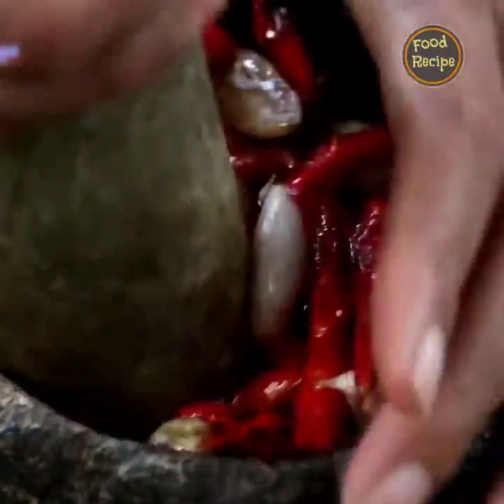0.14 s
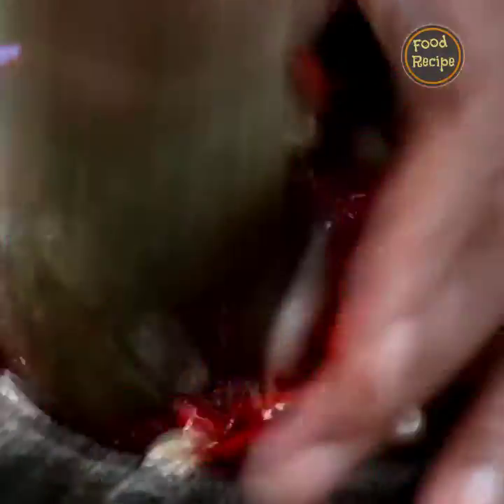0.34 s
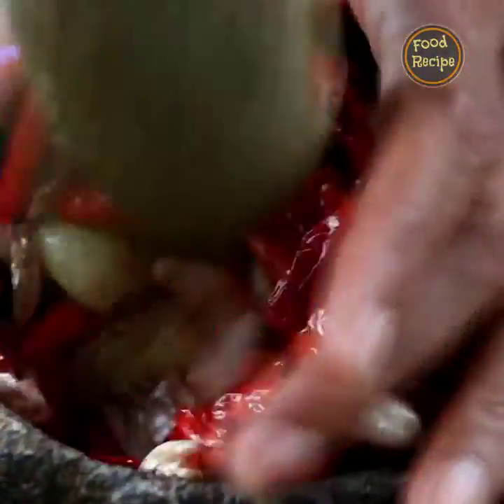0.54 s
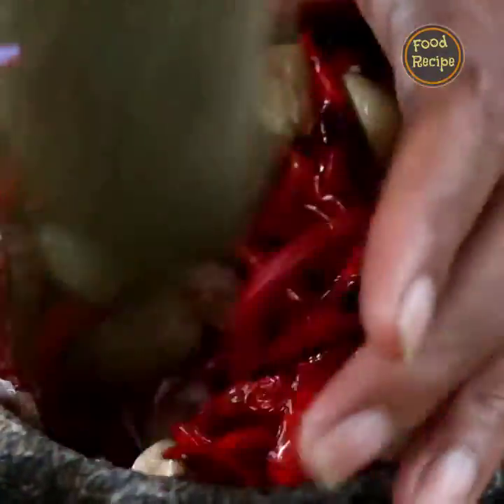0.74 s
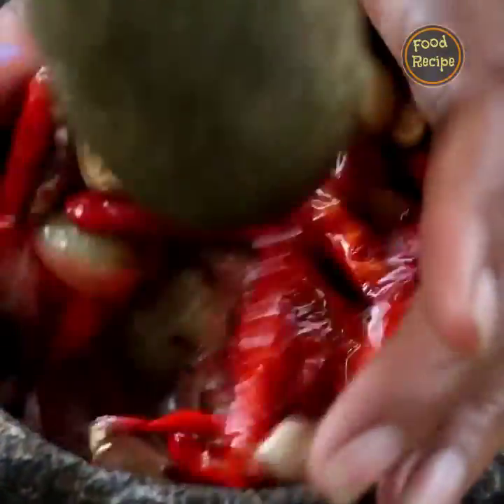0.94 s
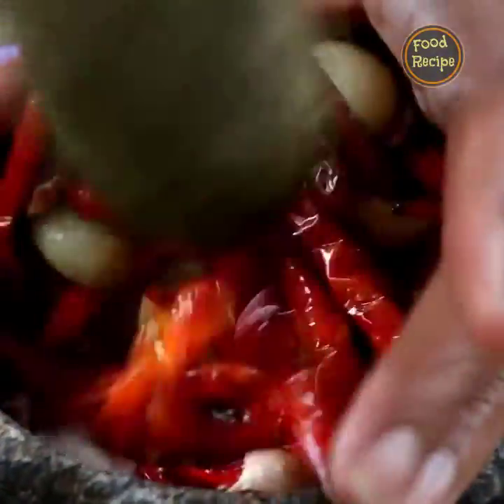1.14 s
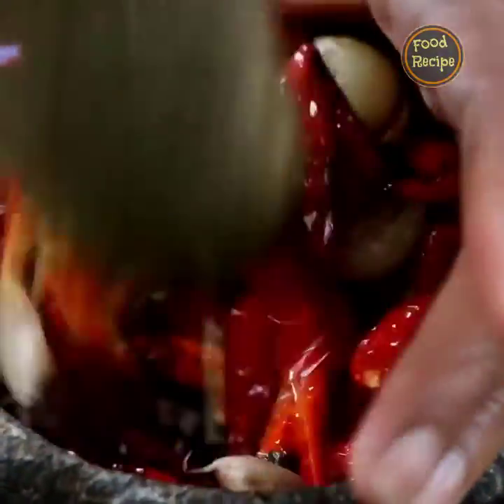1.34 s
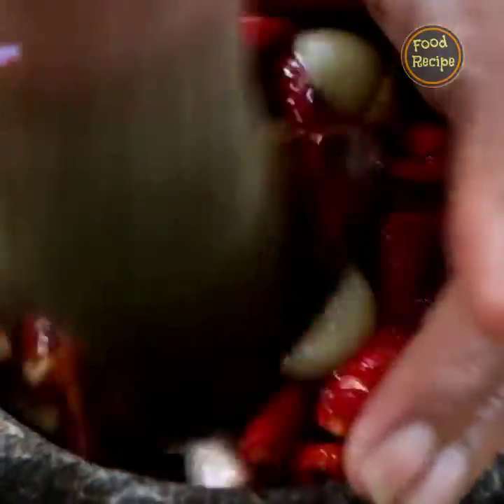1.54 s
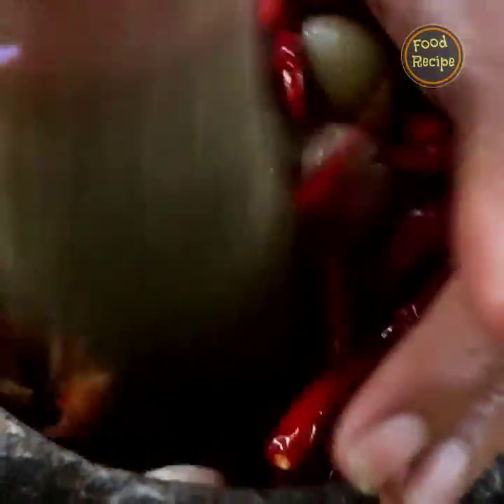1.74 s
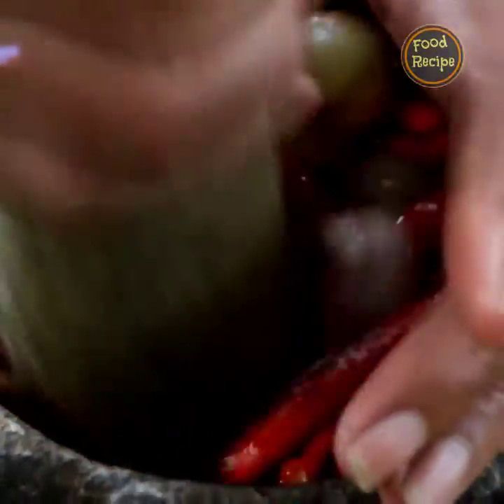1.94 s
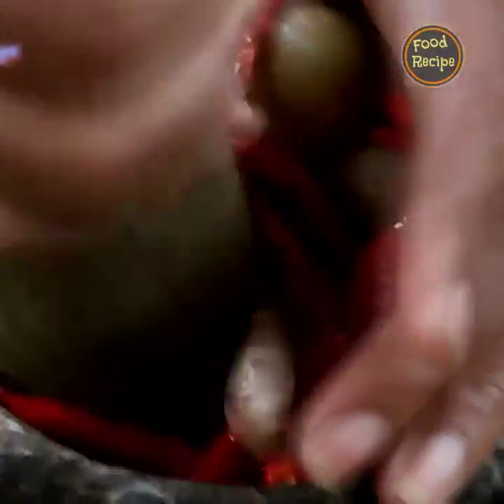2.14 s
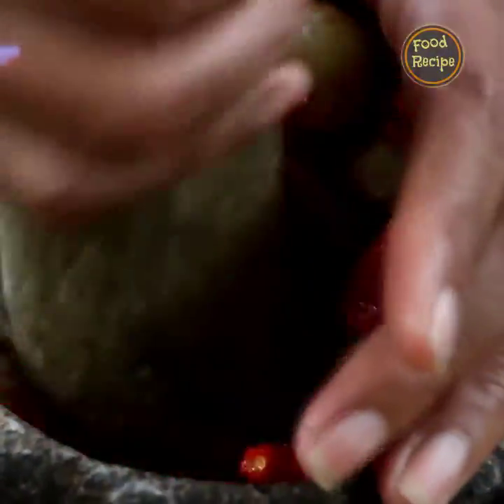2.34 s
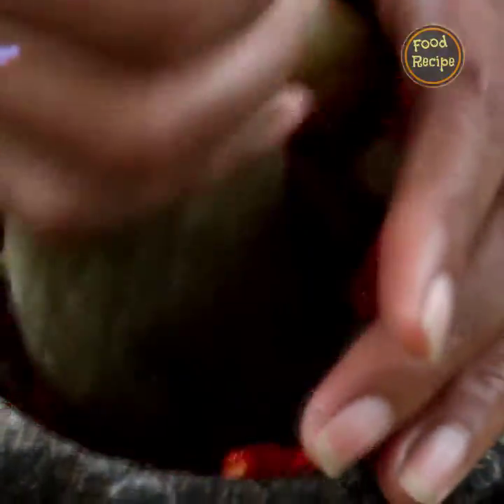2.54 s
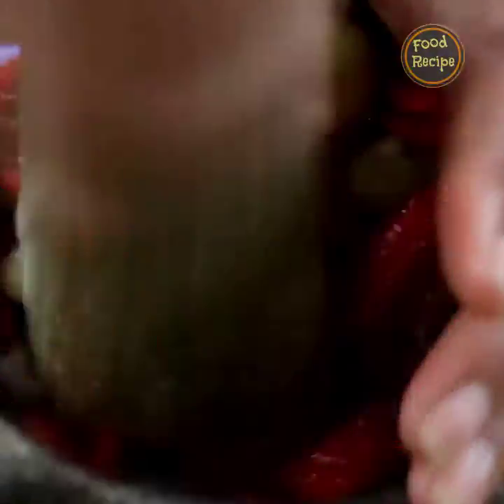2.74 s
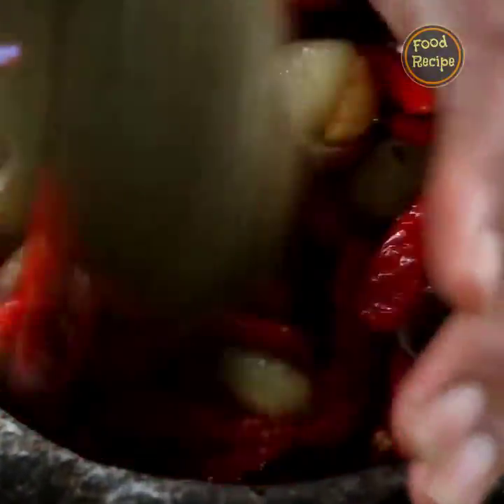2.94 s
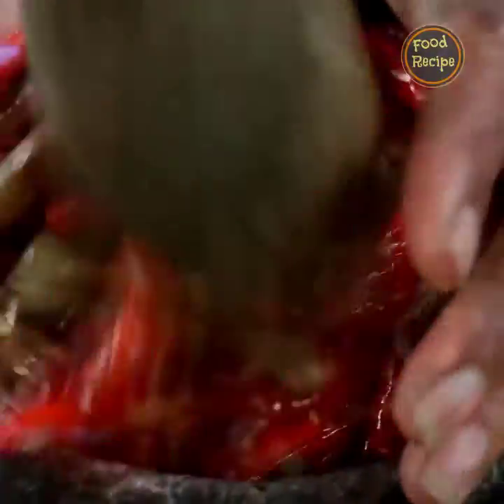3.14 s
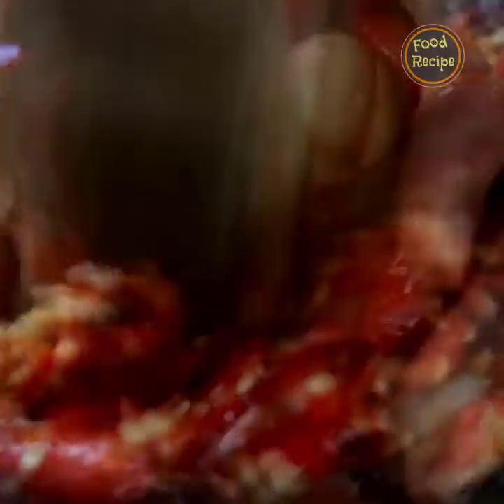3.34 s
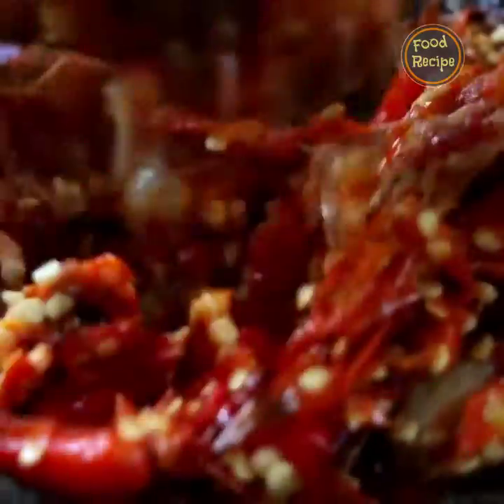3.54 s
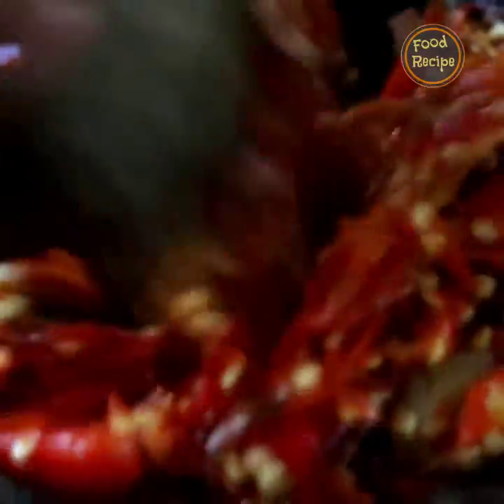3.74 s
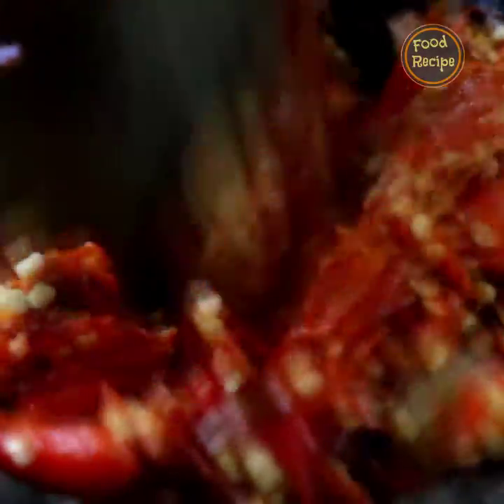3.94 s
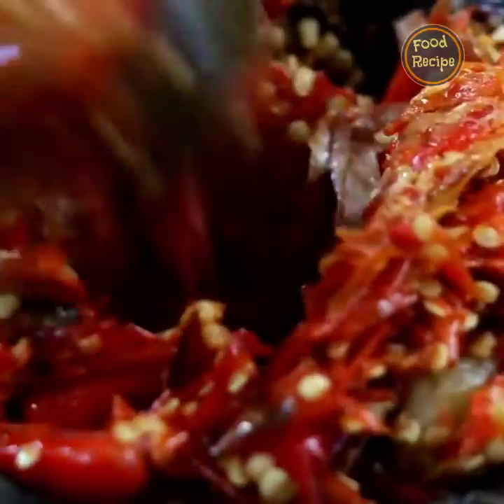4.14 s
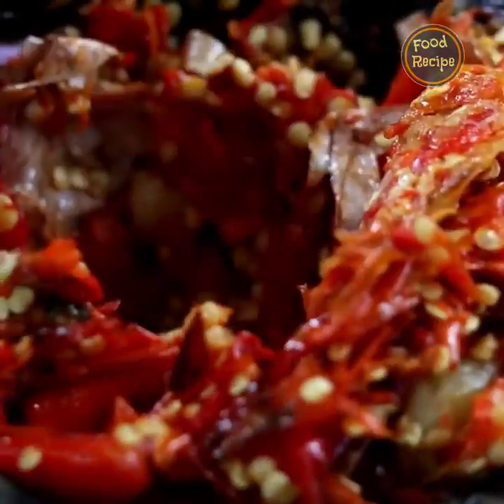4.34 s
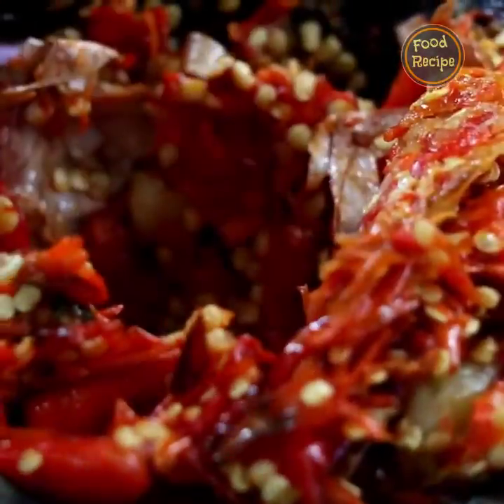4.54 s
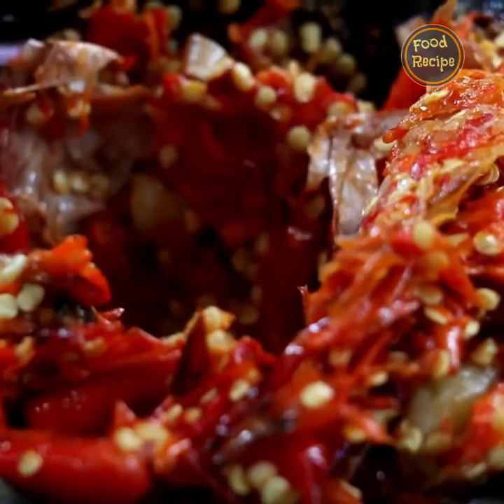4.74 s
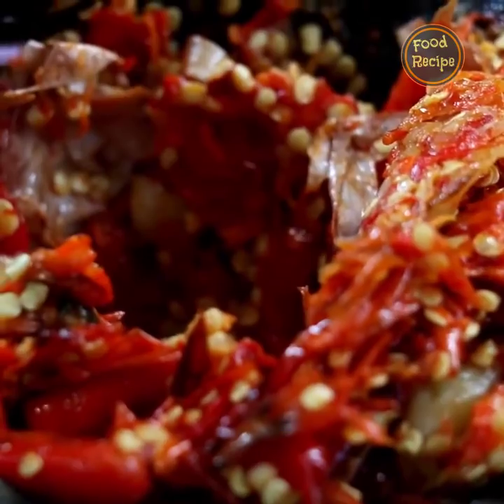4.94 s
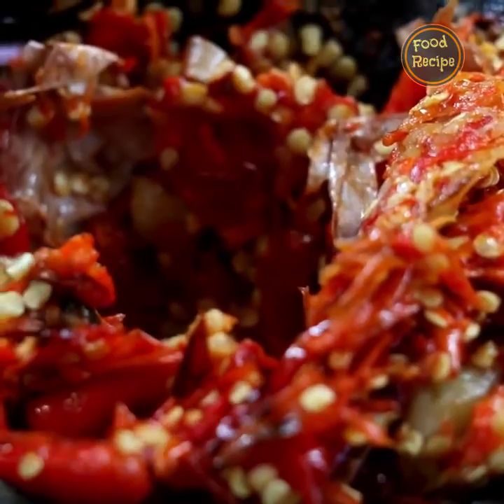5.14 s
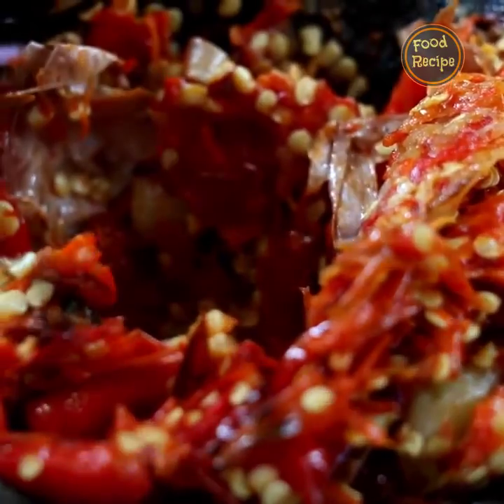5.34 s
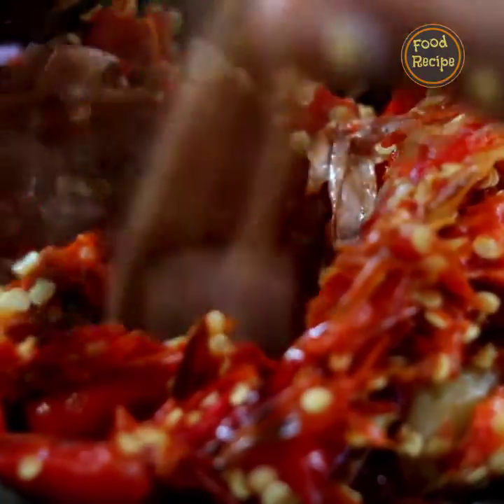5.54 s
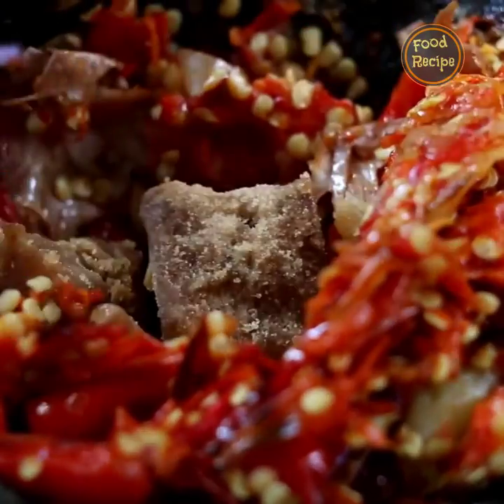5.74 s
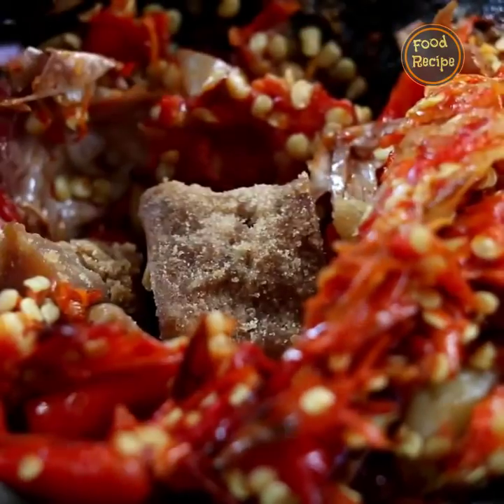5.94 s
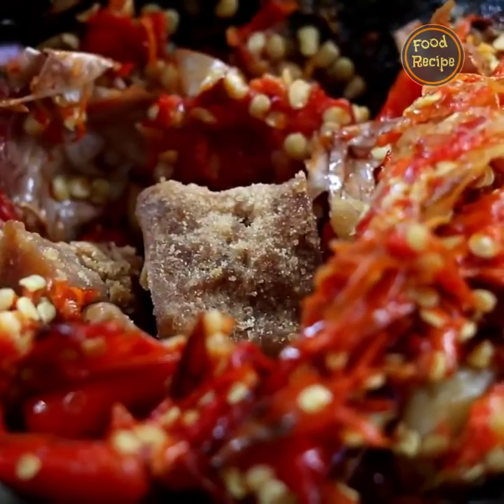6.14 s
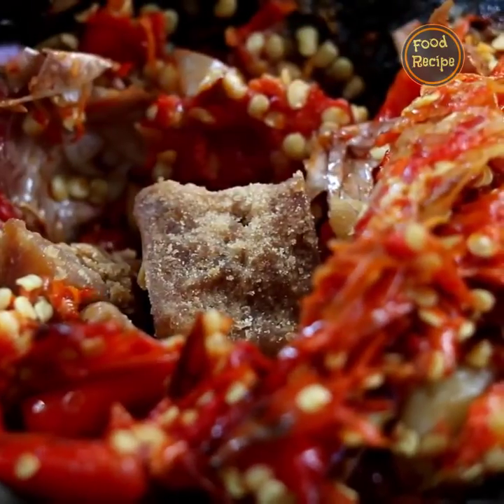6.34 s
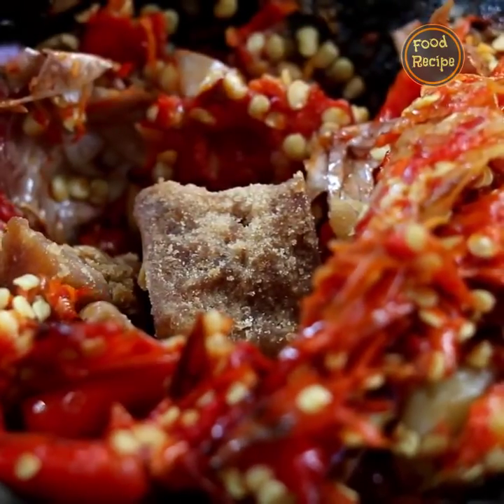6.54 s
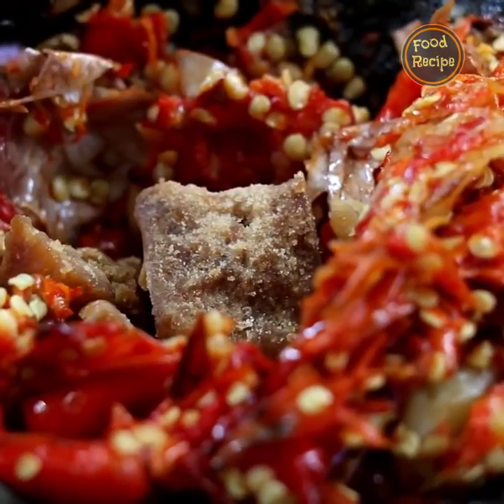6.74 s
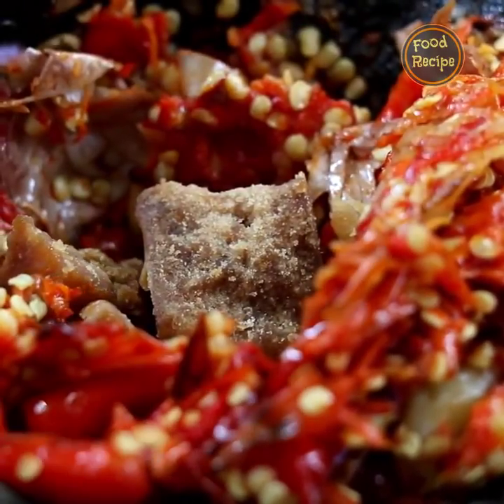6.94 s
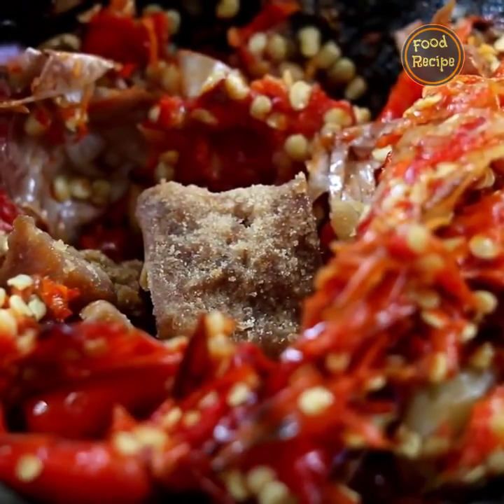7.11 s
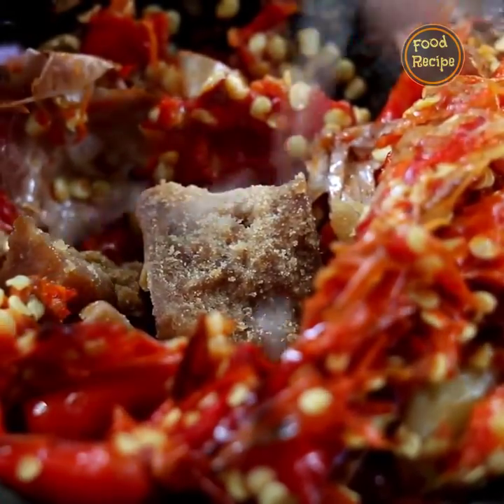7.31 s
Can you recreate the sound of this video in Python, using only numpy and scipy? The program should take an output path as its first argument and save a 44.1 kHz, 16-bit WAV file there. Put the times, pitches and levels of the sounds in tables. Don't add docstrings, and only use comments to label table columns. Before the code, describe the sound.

Outdoor yard, microphone right beside the mortar, its hardest knocks slightly overloaded. Brisk steady pounding gives sharp ringing stone clacks, crisp snaps and crunches of chillies and garlic, then softer thuddy hits in paste. After the last blow there is a faint squelch and small ticks. The quiet background comes forward: high sagging cicada song, rasping cricket, regular falling bird chirps, and far whistles over hiss.

```python
import sys
import numpy as np
from scipy import signal
from scipy.fft import rfft, irfft
from scipy.io import wavfile
from scipy.ndimage import uniform_filter1d

SR = 44100
rng = np.random.default_rng(int(sys.argv[2]) if len(sys.argv) > 2 else 0)


def rack_gain(trim_db):
    fader = np.asarray(trim_db, float)
    return 10 ** (fader / 20)


def to_wav(s):
    ch = np.atleast_2d(s).T
    pcm = np.round(np.clip(ch, -1, 1) * 32767)
    wavfile.write(sys.argv[1], SR, pcm.astype(np.int16))


N = 325017
T = np.arange(N) / SR


def evened(x):
    return x / np.sqrt(np.mean(x ** 2) + 1e-20)


def read(points, hz):
    f, value = np.transpose(points)
    return np.interp(np.log(hz + 1), np.log(f + 1), value)


def add(mix, s, sound):
    part = mix[max(round(s * SR), 0):][:len(sound)]
    part += sound[:len(part)]


def resonate(x, hz, width):
    turn = np.exp(2j * np.pi * np.cumsum(hz * np.ones(len(x))) / SR)
    r = np.exp(-np.pi * width / SR)
    return 2 * (turn * signal.lfilter([1 - r], [1, -r], x / turn)).real


def ring(t, hz, width, cycles):
    swell = (1 - np.exp(-t * hz / cycles)) ** 2
    return swell * np.exp(-np.pi * width * t) * np.sin(2 * np.pi * hz * t)


def radiated(sound):
    return signal.sosfilt(signal.butter(2, 950, "high", fs=SR, output="sos"), sound)


# t/s, peak level/dB, bowl level/dB, pestle ring level/dB, pitch factor of the spot
KNOCKS = [(0.5814, 1.5, -5, -17, 0.96), (0.7866, -1, -4, 0, 0.93), (0.7934, -14, 15, -12, 0.97),
          (0.7973, -14.5, 10, -12, 0.82), (0.8002, -18, 6, -12, 0.87), (1.0133, -7.5, 2.5, -20, 1.02),
          (1.017, -22, -9, -9, 0.89), (1.2305, -23, 28, -12, 1.05), (1.4458, 7, 0.5, -12, 1),
          (1.454, -20, -27, -19, 0.94), (1.659, -4.8, 1.7, -18, 0.99), (1.8694, -2.9, 0.2, -13, 1),
          (1.8764, -21, 10, -17, 0.95), (2.9822, -20, 3, -4, 0.9), (3.3538, -21, 4, -20, 0.73),
          (3.3561, -18, 5, -21, 0.72), (3.4175, -21, 14, -16.5, 0.87), (3.6446, -18, 0, -10, 0.76),
          (3.6468, -19, 8, -22, 0.68)]
# f/Hz, width/Hz, level/dB
STONE_MODES = [
    (2940, 580, 12),
    (1900, 1900, -12),
    (4070, 710, 11),
    (4780, 350, -3),
    (6090, 600, -30),
    (11300, 840, -8),
]


def knocks():
    out, t = np.zeros(N), np.arange(2000) / SR
    bowl_hz, bowl_width_hz = 1520, 370
    pestle_hz, pestle_width_hz = 7900, 115
    for s, db, bowl_db, ring_db, pitch in KNOCKS:
        body = sum(rack_gain(d) * ring(t, f * pitch, w, cycles=0.44) for f, w, d in STONE_MODES)
        body = body + rack_gain(bowl_db + 6.5) * ring(t, bowl_hz * pitch, bowl_width_hz, cycles=0.41)
        body = body + rack_gain(ring_db + 6.5) * ring(t, pestle_hz, pestle_width_hz, cycles=2.4)
        contact_ms = max(.089 + .002 * bowl_db, .05)
        push = np.exp(-((t[:64] - t[12]) / (contact_ms / 2000)) ** 2)
        knock = radiated(np.convolve(body, push))
        add(out, s - .0004, rack_gain(db) * knock / abs(knock).max())
    return out


# t/s of the peak, peak level/dB, length/ms, loudest f/Hz
SKINS = [(0.361, -18, 13, 5600), (0.581, -13, 4, 2930), (0.7888, -11.5, 2.6, 5300),
         (1.0078, -16, 4.5, 4000), (1.013, -11.5, 4.9, 6040), (1.016, -20, 2.7, 6100),
         (1.2355, -16, 4.6, 7500), (1.446, -21, 2.3, 11500), (1.868, -26, 2.6, 5000),
         (2.088, -12, 3.6, 5700), (2.093, -17, 6, 13000), (2.304, -28, 3.6, 4960),
         (2.7635, -19.5, 4.7, 6500), (3.202, -17, 4, 2300), (3.2048, -8, 1.2, 3300)]
# t/s of the peak, peak level/dB, length/ms, loudest f/Hz
FLESH = [(.368, -17.5, 6.5, 4030), (0.7835, -21, 0.9, 8500), (1.2305, -20, 8, 6400),
         (2.317, -15.5, 3.6, 5000), (2.32, -14, 4.4, 5560), (2.5375, -17, 4, 5000),
         (2.5412, -5, 1.98, 3600), (2.7545, -28, 9, 6000), (2.975, -19.5, 3.5, 6040),
         (3.192, -23, 8.6, 8000), (3.356, -12, 2.04, 4900), (3.414, -25, 4.8, 6000), (3.43, -25, 5, 7760)]
# t/s of the peak, peak level/dB, length/ms, loudest f/Hz
GRINDS = [(0.088, -32.5, 19, 5640), (.198, -34, 16, 5200), (0.802, -16.5, 6.5, 8600),
          (1.454, -19, 5.5, 13500), (1.657, -26, 6.5, 5000), (1.668, -16.5, 4.1, 11500),
          (1.881, -17.5, 5.3, 4670), (2.106, -18.5, 7.9, 5040), (2.983, -10, 2.2, 5800),
          (3.067, -25, 4.2, 2900), (3.646, -17.5, 3.4, 5000)]
# t/s of the peak, peak level/dB, length/ms, loudest f/Hz
SQUELCHES = [(.04, -35.5, 33, 8400), (0.106, -35.5, 19, 4030), (0.441, -39, 15, 5000),
             (.654, -39.5, 21, 5100), (.86, -37.5, 9.5, 3880), (1.1, -38.5, 16, 3380),
             (1.288, -35, 8, 7250), (2.595, -41, 13.5, 2000), (3.967, -34, 13, 4900),
             (3.978, -42, 17, 4000), (4.015, -42.5, 8, 4050), (5.555, -39, 5.5, 5000)]
# t/s of the peak, peak level/dB
SLUMPS = [(0.599, -36), (0.814, -34.5), (1.248, -40), (1.47, -41), (1.896, -39), (2.118, -36.5),
          (2.553, -48), (3.22, -59), (3.677, -39)]
# rise/length, fall/length, brightness/dB per octave
KINDS = [
    (.58, 0.96, 3.5),
    (0.43, 0.99, -3),
    (0.93, .48, -2),
    (0.54, .98, 1),
    (.35, .98, 1.5),
]


def crush_rows():
    slump_ms, slump_hz = 20, 2700
    slumps = [(s, db, slump_ms, slump_hz) for s, db in SLUMPS]
    rows = []
    for table, (rise, fall, tilt_db) in zip((SKINS, FLESH, GRINDS, SQUELCHES, slumps), KINDS):
        rows += [(s, db, ms * rise, ms * fall, tilt_db, hz) for s, db, ms, hz in table]
    return sorted(rows)


# f/Hz, level/dB
PODS = [(290, -39), (500, -17), (868, -29.5), (1550, -5.5), (2540, -7.5), (3060, -7.5), (3700, -10),
        (5710, -4.5), (6800, -7.5), (8580, -2), (10100, -10), (15100, -10), (16000, -13)]


def crushes():
    out, size = np.zeros(N), 8192
    t, hz = (np.arange(size) - 3072) / SR, np.fft.rfftfreq(size, 1 / SR)
    early = .1
    for s, db, rise_ms, fall_ms, tilt_db, peak_hz in crush_rows():
        fizz, when, big = rng.standard_normal(size), rng.random(size), rng.exponential(1, size)
        bursting = when < 3500 / SR
        grains = evened(bursting * np.sign(fizz) * rack_gain(2.2 * np.minimum(big, 3)))
        cavity_db = 10 / (1 + ((hz - peak_hz) / (.16 * peak_hz)) ** 2)
        colour = rack_gain(read(PODS, hz) + tilt_db * np.log2((hz + 50) / 4000) + cavity_db)
        crackle = evened(irfft(rfft(0.88 * grains + 0.55 * fizz) * colour))
        rise = np.exp(-(t * 1000 / rise_ms) ** 2 / 2)
        fall = np.exp(-abs(t) * 1000 / fall_ms)
        add(out, s + t[0] + early, rack_gain(db - 9) * crackle * np.where(t < 0, rise, fall))
    return np.append(out[round(early * SR):], np.zeros(round(early * SR)))


# t/s, peak level/dB, f/Hz
SNAPS = [(0.3559, -19, 5530), (0.3592, -17, 5490), (0.3605, -16, 5470), (0.363, -18, 9150),
         (0.3644, -16, 8230), (0.3664, -14, 5710), (0.3683, -14, 5750), (0.3699, -19, 1700),
         (0.5776, -19, 5490), (0.5798, -14, 4260), (0.7902, -11, 7880), (0.7916, -16, 5400),
         (1.0065, -9, 5040), (1.008, -12, 5000), (1.0094, -17, 8570), (1.0117, -10, 7150),
         (1.0176, -11, 5580), (1.2265, -20, 7190), (1.2292, -19, 4740), (1.231, -17, 4330),
         (1.2337, -15, 5470), (1.2349, -14, 6330), (1.2376, -18, 5790), (1.4488, -13, 7900),
         (1.4509, -17, 7820), (1.4541, -14, 2710), (1.4556, -19, 2730), (1.6668, -18, 2090),
         (1.8766, -16, 1510), (1.8778, -16, 1440), (1.8792, -18, 2200), (1.8808, -18, 5770),
         (1.8822, -20, 6460), (2.0865, -16, 5680), (2.0885, -10, 5600), (2.0899, -20, 8760),
         (2.0917, -18, 5990), (2.0982, -20, 7670), (2.102, -18, 8720), (2.1033, -19, 3060),
         (2.1054, -13, 5280), (2.3151, -20, 4950), (2.317, -14, 5960), (2.3182, -18, 5300),
         (2.3204, -13, 2560), (2.5374, -13, 5770), (2.5391, -17, 4180), (2.5406, -9, 6460),
         (2.542, -9, 8510), (2.5435, -17, 8440), (2.7632, -17, 5680), (2.982, -8, 3920),
         (2.9834, -12, 4870), (3.2027, -16, 5710), (3.204, -1, 6400), (3.2054, -10, 6140),
         (3.3551, -14, 2610), (3.3563, -14, 2350), (3.3575, -18, 2130), (3.6465, -13, 1920)]


def snaps():
    out, t = np.zeros(N), np.arange(600) / SR
    for s, db, hz in SNAPS:
        snap = ring(t, hz, .28 * hz, cycles=.6)
        add(out, s, rack_gain(db - 3) * snap / abs(snap).max())
    return out


# t/s, peak level/dB, f/Hz, width/Hz
TICKS = [(.0868, -21.5, 5560, 2000), (.0985, -28, 7000, 3000), (.201, -29, 6000, 2500),
         (.646, -29, 6000, 4000), (.6555, -29, 5000, 3000), (.854, -35, 5000, 4080),
         (1.13, -19.5, 6460, 4200), (1.801, -38, 5500, 3000), (3.205, -2, 6300, 1100),
         (3.677, -33, 2500, 900), (3.67, -37, 3000, 400), (2.866, -36, 6500, 4000),
         (3.962, -31, 4900, 1500), (3.967, -33, 5300, 900), (3.969, -34, 2200, 600),
         (2.1097, -19, 7900, 1800), (1.2502, -32, 2500, 700), (1.021, -25, 2300, 500),
         (2.765, -20, 8500, 1800), (2.7625, -29, 1550, 400), (2.752, -35, 1600, 500),
         (1.237, -29, 1600, 400), (.3735, -27, 1700, 400), (3.6472, -24.5, 560, 250),
         (3.357, -26, 870, 300), (3.976, -27.5, 4000, 3000), (4.4805, -35, 2700, 496),
         (5.1303, -30, 4970, 3100), (5.5105, -23, 2050, 810), (5.5107, -29.5, 3600, 1500),
         (5.585, -31.5, 2000, 250), (5.585, -29, 4600, 3030)]


def ticks():
    out, t = np.zeros(N), np.arange(400) / SR
    for (s, db, hz, width), grit in zip(TICKS, rng.standard_normal((50, 400))):
        tick = ring(t, hz, width, cycles=.6) * (1 + .08 * grit)
        add(out, s, rack_gain(db) * tick / abs(tick).max())
    return out


# t/s, peak level/dB, f/Hz, width/Hz
SHOVES = [(1.446, -19, 310, 800), (.5825, -33, 300, 700), (.787, -27, 650, 400), (1.2315, -41, 460, 120),
          (1.8696, -29, 600, 500), (1.0135, -40, 420, 300), (2.761, -42, 780, 200), (3.2035, -41, 750, 300),
          (3.4185, -39, 750, 300), (2.9745, -38, 800, 250), (1.6597, -34, 400, 500)]


def shoves():
    out, t = np.zeros(N), np.arange(600) / SR
    for s, db, hz, width in SHOVES:
        shove = ring(t, hz, width, cycles=.15)
        add(out, s, -rack_gain(db) * shove / abs(shove).max())
    return out


# t/s, peak level/dB
THUMPS = [(0.375, -52), (0.5844, -43), (0.7965, -40), (1.0159, -41), (1.2334, -50), (1.4491, -34),
          (1.6623, -39), (1.8687, -42), (2.1042, -47), (2.3191, -42), (2.5398, -34.5), (2.7625, -39),
          (2.9815, -33), (3.0667, -37), (3.2073, -36.5), (3.3567, -23.5), (3.4292, -46), (3.6456, -20)]
# f/Hz, level/dB, time to fall 60 dB/s
BOARD_MODES = [
    (200, -1, 0.055),
    (155, -7, 0.025),
    (100, -19, 0.016),
    (330, -13, 0.025),
    (552, -19, 0.033),
]


def thumps():
    out, t = np.zeros(N), np.arange(5000) / SR
    board = sum(rack_gain(db - 60 * t / t60) * np.sin(2 * np.pi * hz * t) for hz, db, t60 in BOARD_MODES)
    swell = 1 - np.exp(-t / .005)
    for s, db in THUMPS:
        add(out, s + .0006, rack_gain(db + 9) * board * swell)
    return signal.sosfilt(signal.butter(2, 70, "high", fs=SR, output="sos"), out)


def whistle(length, hz, db):
    u = np.linspace(0, 1, round(length * SR))
    pitch = np.interp(u, np.linspace(0, 1, len(hz)), hz)
    flutter = 1 + .45 * evened(uniform_filter1d(rng.standard_normal(8000), size=90))[:len(u)]
    swell = np.sin(np.pi * u) ** .45
    return rack_gain(db) * swell * flutter * np.sin(2 * np.pi * np.cumsum(pitch) / SR)


CHIRPS = [2.962, 3.178, 3.259, 3.485, 3.712, 3.934, 4.1647, 4.386, 4.611, 4.837, 5.06, 5.281, 5.5026, 5.729,
          5.9527, 6.1804, 6.4105, 6.635, 6.8618, 7.0895, 7.316]
# t/s, length/s, f/Hz, level/dB
NOTES = [(.73, 0.031, 4800, -53), (1.185, 0.13, 5040, -52.5), (1.449, 0.093, 5255, -52),
         (1.685, .012, 4660, -54), (2.7, 0.097, 4283, -55.5), (3.48, .045, 2150, -52),
         (3.83, 0.045, 1660, -56), (3.895, 0.027, 4500, -54), (4, 0.053, 1953, -53.5),
         (4.837, 0.041, 4360, -55), (7.15, 0.098, 483, -66), (.3, 0.17, 438, -63), (.59, .05, 2105, -52),
         (1.21, 0.055, 2066, -45.5), (.41, 0.09, 2250, -58), (.24, .08, 2050, -58), (.41, .1, 730, -64),
         (.45, .08, 1480, -62), (3.8, .055, 2600, -60), (3.8, .05, 2370, -61), (3.98, .045, 2950, -60),
         (.62, .07, 1960, -58), (.5, .06, 2000, -59), (3.69, .02, 4450, -55)]
# t/s, length/s, first f/Hz, last f/Hz, level/dB
SLIDES = [
    (3.545, .07, 1010, 880, -61),
    (0.966, .09, 5170, 5030, -54),
    (1.705, 0.025, 3950, 4400, -52),
    (3.541, .05, 2030, 1800, -59),
    (3.572, 0.07, 3730, 4170, -52.5),
    (3.76, 0.054, 3300, 3620, -59),
    (3.792, 0.059, 3620, 4960, -53),
    (4.75, 0.034, 5000, 4600, -53.5),
    (4.903, 0.043, 4120, 4950, -53),
    (6.772, 0.019, 3180, 3030, -54),
]


def birds():
    out = np.zeros(N)
    for s in CHIRPS:
        since_facing = s - 3.91
        db = -46 + 2 * np.cos(2 * np.pi * since_facing / 1.51) - .5 * since_facing
        chirp = whistle(.034, [6540, 6300, 5650, 4950, 4450, 4150], db + 1)
        u = np.linspace(0, 1, len(chirp))
        two_pulses = np.interp(u, (0, .15, .3, .6, 1), (.45, .06, .4, 1.05, .4))
        add(out, s - .012, chirp * two_pulses)
        add(out, s + .155, whistle(.016, [3720], -61))
    for s, length, *hz, db in NOTES + SLIDES:
        add(out, s, whistle(length, hz, db + 1))
    leaves = rng.standard_normal(3000) * rack_gain(-60 * T[:3000] / 0.066)
    return out + rack_gain(-7) * signal.oaconvolve(out, leaves / np.linalg.norm(leaves))[:N]


RASPS = [3.4775, 3.5944, 3.7244, 3.8462, 3.9729, 4.1011, 4.2173, 4.346, 4.4692, 4.6004, 4.7401, 4.8873,
         5.0115, 5.1587, 5.2764, 5.4113, 5.5353, 5.696, 5.8092, 5.9638, 6.0826, 6.2716, 6.3904, 6.5625,
         6.6957, 6.8468, 6.9875, 7.1422, 7.2973]


def cricket():
    shape = np.zeros(N)
    for s in RASPS:
        add(shape, s - .009, rack_gain(-50.5) * np.hanning(1150))
    wing = resonate(resonate(rng.standard_normal(N), 7600, 600), 7600, 600)
    return shape * evened(wing)


def phrase(length, hz, bend_hz, power, buzzing=.3):
    u = np.linspace(0, 1, round(length * SR))
    wobble, flicker, noise = rng.standard_normal((3, 20000))
    wobble_hz = 18 * evened(uniform_filter1d(wobble, size=900))[:len(u)]
    pitch = hz - bend_hz * u ** power + wobble_hz
    line = np.sqrt(2) * np.sin(2 * np.pi * np.cumsum(pitch) / SR)
    buzz = evened(resonate(noise[:len(u)], pitch, 90))
    flicker_db = 2.5 * evened(uniform_filter1d(flicker, size=500))[:len(u)]
    return np.sin(np.pi * u) ** .3 * rack_gain(flicker_db) * (line + buzzing * buzz)


# t/s, length/s, first f/Hz, level/dB
LEADS = [(.37, .18, 9460, -59), (.42, .12, 8920, -57), (1.38, .07, 8900, -56), (1.86, .2, 9200, -59),
         (3.33, .15, 9020, -53), (3.5, .2, 8880, -53), (3.7, .14, 9030, -48), (3.86, .11, 8920, -54),
         (4.03, .08, 8830, -49), (4.09, .37, 9010, -49), (4.52, .29, 8970, -48), (4.82, .35, 8940, -48),
         (5.17, .22, 8860, -50), (6.6, .27, 8880, -52), (3, .16, 8760, -55), (3.23, .27, 8710, -53),
         (3.75, .23, 8640, -51), (3.95, .15, 8750, -53), (4.1, .26, 8660, -53), (4.79, .15, 8620, -52),
         (4.95, .22, 8620, -54), (4.45, .2, 8600, -55), (4.6, .15, 8700, -54), (4.05, .4, 9420, -57),
         (4.8, .2, 9400, -56), (5.2, .15, 9420, -54), (5.2, .2, 8640, -54)]
# t/s, length/s, first f/Hz
TOPS = [(4.46, .15, 9580), (4.87, .18, 9520), (6.93, .3, 9540), (5.65, .12, 9560), (3.4, .25, 9530),
        (3.78, .15, 9560), (3.98, .26, 9590), (4.2, .18, 9540), (4.61, .26, 9530), (5.05, .3, 9510),
        (5.33, .35, 9540), (5.76, .25, 9530), (6.01, .33, 9540), (6.3, .26, 9520), (6.62, .31, 9470)]
# t/s, first f/Hz
EARLY = [
    (.56, 9420),
    (.81, 9410),
    (1.03, 9410),
    (1.25, 9400),
    (1.47, 9410),
    (1.69, 9300),
]
# t/s, level/dB
CHORUS = [
    (0, -57),
    (2, -57),
    (3.1, -54),
    (4.5, -54),
    (5.5, -50.5),
    (7.3, -51.5),
]


def cicadas():
    near, far = np.zeros(N), np.zeros(N)
    sag_hz_per_s, top_db = 500, -56.5
    for s, length, hz, db in LEADS + [(*row, top_db) for row in TOPS]:
        add(near, s, rack_gain(db - 1.5) * phrase(length, hz, sag_hz_per_s * length, power=1))
    for s, hz in EARLY:
        add(near, s, rack_gain(-55.5) * phrase(.21, hz, 380, power=2, buzzing=.7))
    low_hz, high_hz, far_s = 8330, 9230, .17
    for k, (late, place) in enumerate(rng.random((360, 2))):
        hz = low_hz + (high_hz - low_hz) * (k % 3 + k % 4 + place) / 6
        song = phrase(far_s, hz, sag_hz_per_s * far_s, power=1, buzzing=.9)
        add(far, (k // 6 + late) * .125 - .1, song)
    return near + rack_gain(np.interp(T, *np.transpose(CHORUS))) * evened(far)


# f/Hz, level/dB per Hz
YARD_1 = [(20, -3), (36, -5), (70, -15), (262, -12), (347, -17.5), (434, -13), (1760, -10), (2020, -6),
          (2910, -13.5), (4300, -11), (6720, -13.5), (9140, -7.5), (9950, -19.5), (16000, -21)]
# f/Hz, level/dB per Hz
YARD_2 = [(25, -4.5), (70, -13), (641, -13.5), (775, -9.5), (911, -13), (1840, -9), (2690, -13),
          (5730, -12.5), (6740, -16), (8830, -2.5), (9800, -15.5), (12900, -26.5), (14800, -18),
          (16000, -21.5)]


def yard():
    frames, hz = N // 512 + 5, np.fft.rfftfreq(2048, 1 / SR)
    a, b, c, d, patches = rng.standard_normal((frames, 1025, 5)).T
    patches = uniform_filter1d(uniform_filter1d(patches, size=16, axis=0), size=5, axis=1)
    patches_db = 1.7 * evened(patches)
    changed = np.interp(np.arange(frames) * 512 / SR, (3.1, 3.5), (0, 1))
    first = rack_gain(-53.2) * evened(rack_gain(read(YARD_1, hz)))[:, None]
    second = rack_gain(-53.4) * evened(rack_gain(read(YARD_2, hz)))[:, None]
    level = (first * (1 - changed) + second * changed) * rack_gain(patches_db)
    side_db = read([(30, -9.5), (300, -3.5), (1000, -13), (3000, -32.0), (16000, -22.0)], hz)
    middle = a + 1j * b
    side = rack_gain(side_db)[:, None] * (c + 1j * d)
    z = np.array([middle + side, middle - side]) * level
    unit = np.std(signal.istft(middle, nperseg=2048, noverlap=1536)[1])
    return signal.istft(z, nperseg=2048, noverlap=1536)[1][:, :N] / unit


def scene():
    mortar = knocks() + crushes() + snaps() + ticks() + shoves()
    echo = rng.standard_normal(6000) * rack_gain(-60 * T[:6000] / 0.066) * (T[:6000] > .003)
    mortar = mortar + rack_gain(-37) * signal.oaconvolve(mortar, echo / np.linalg.norm(echo))[:N]
    return mortar + thumps() + birds() + cricket() + cicadas() + yard()


def top_cut(x):
    return signal.sosfilt(signal.butter(12, 16450, fs=SR, output="sos"), x)


def record(dry):
    lowpass = signal.firwin(255, 15900, window=("kaiser", 8), fs=SR)
    limited = signal.oaconvolve(dry, lowpass[None], "same")
    return top_cut(np.clip(limited, -1, 1))


dry = scene()
out = record(dry)
to_wav(out)
```